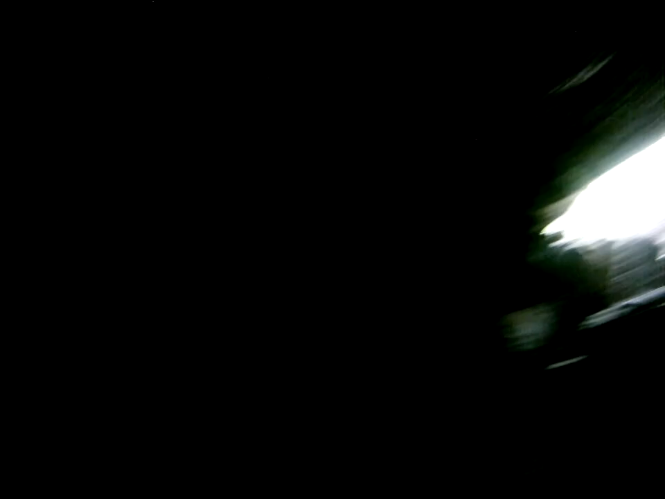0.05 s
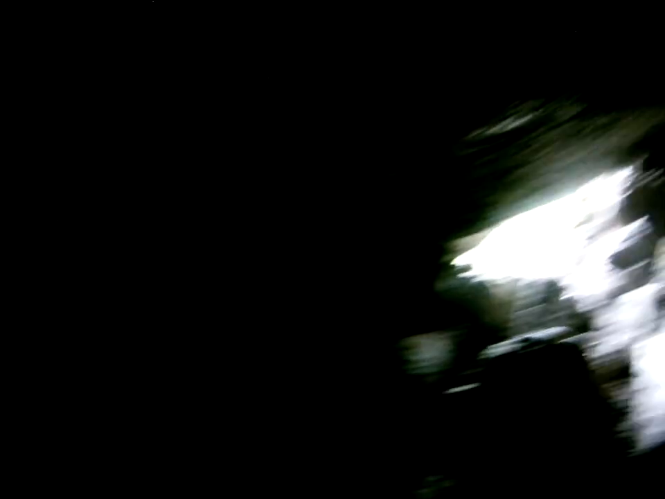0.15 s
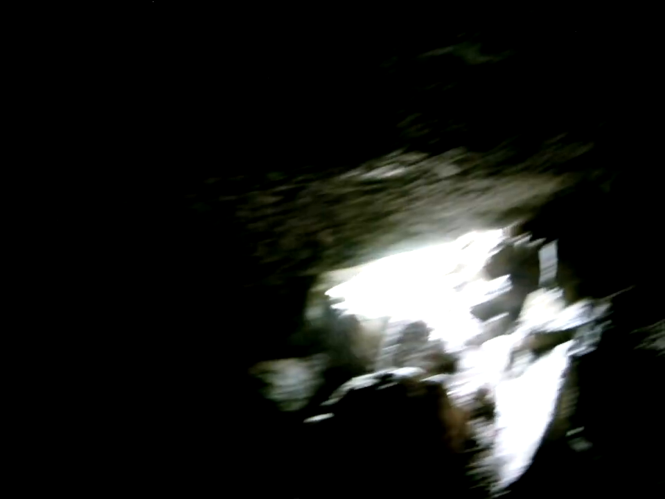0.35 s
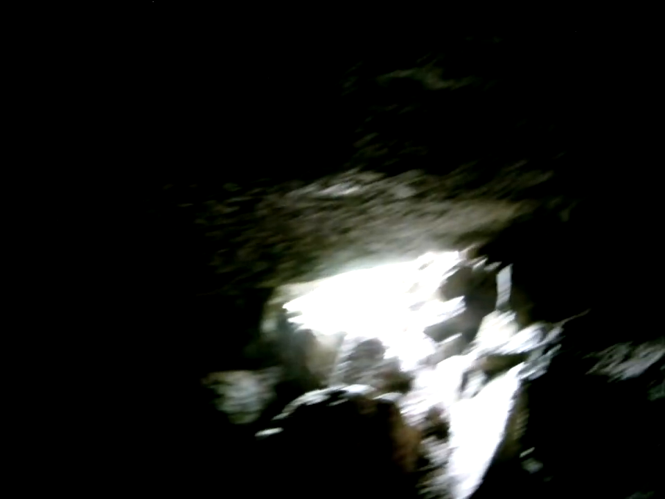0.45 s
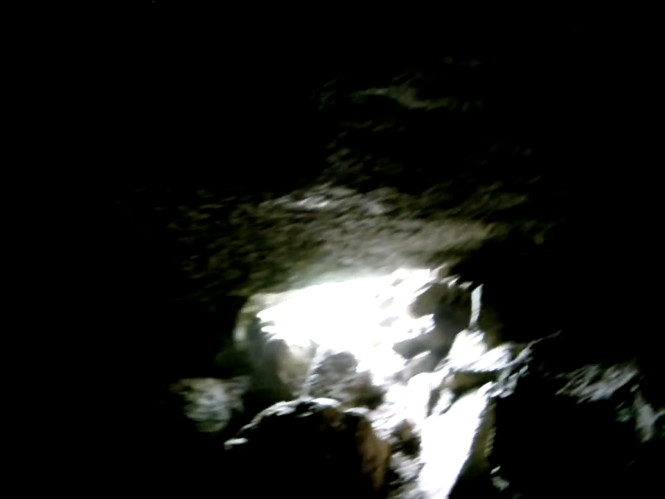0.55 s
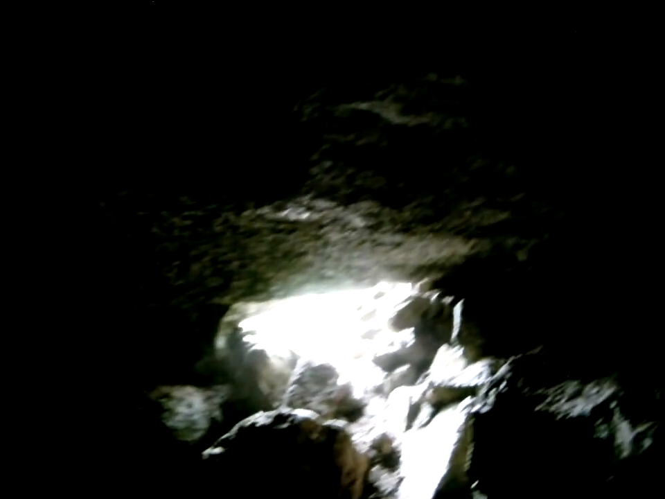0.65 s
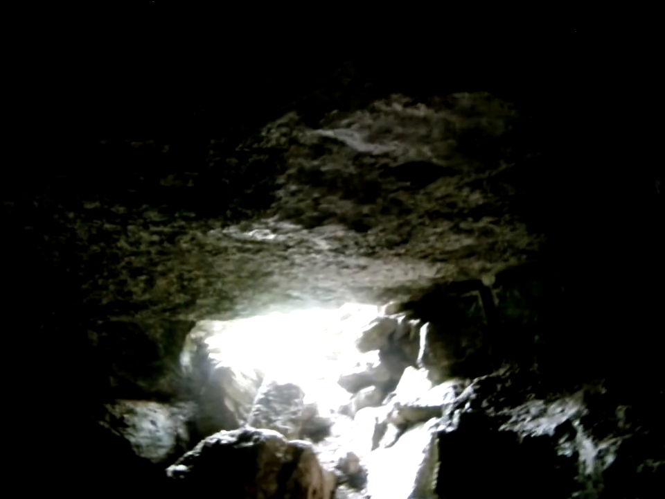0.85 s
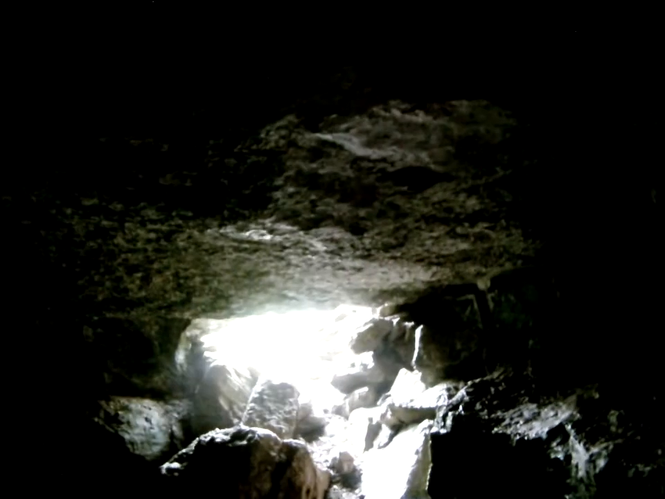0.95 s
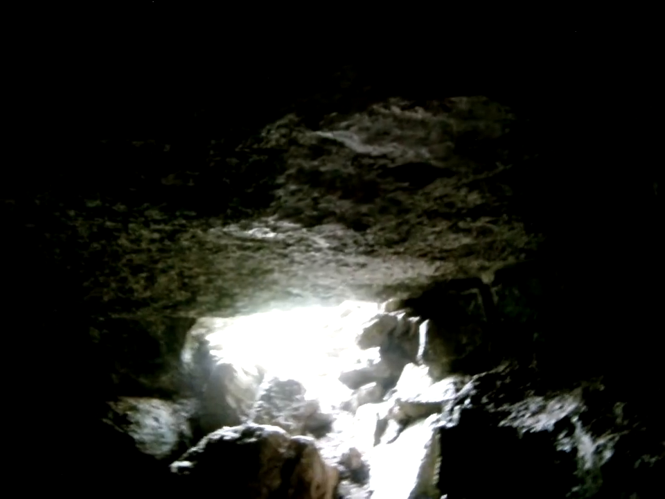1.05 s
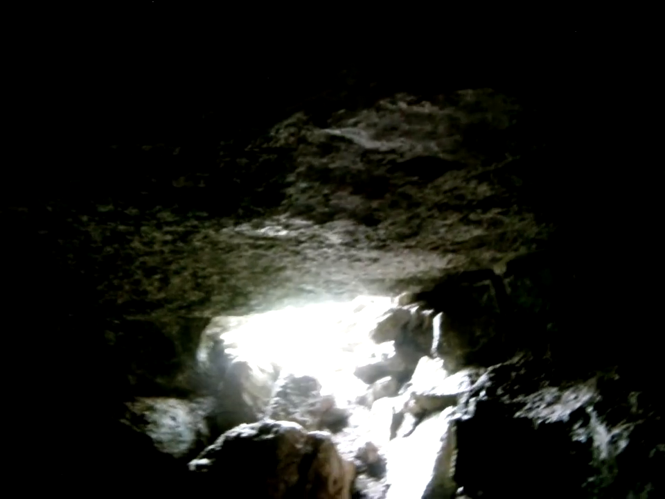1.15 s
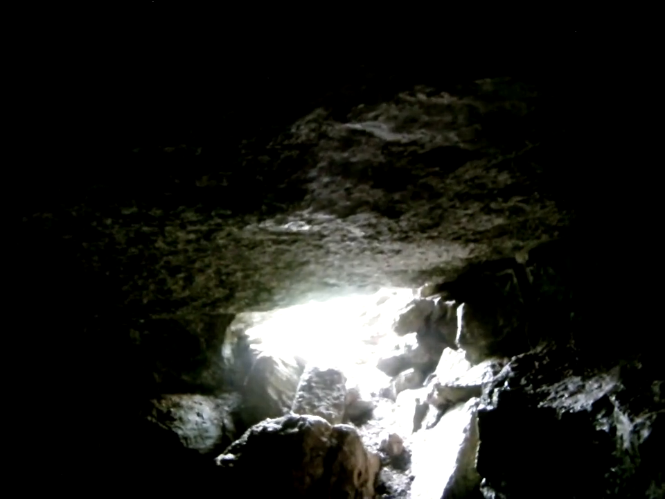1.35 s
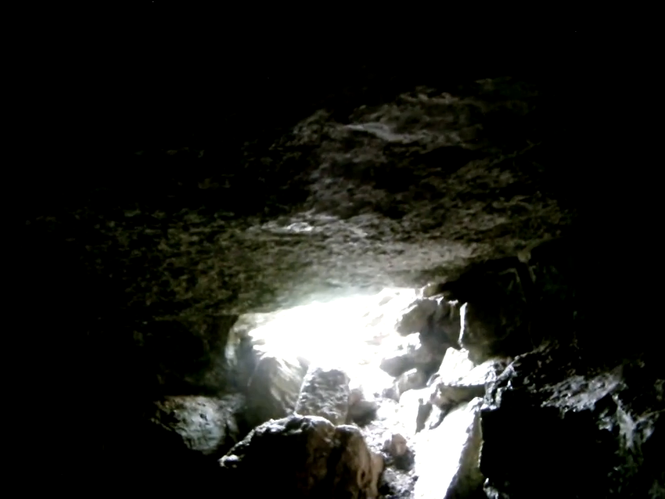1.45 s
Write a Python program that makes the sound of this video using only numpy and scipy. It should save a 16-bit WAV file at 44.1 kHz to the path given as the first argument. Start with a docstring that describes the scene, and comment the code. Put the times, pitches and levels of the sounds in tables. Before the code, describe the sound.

Camera handling noise in a quiet cave: one close plastic click comes first, followed by several duller knocks and low thumps through the case. They die away, leaving faint steady air and microphone hiss.

```python
"""Camera handling in a quiet cave.

Fingers shift on a hand-held camera: dry, close clicks and soft bumps reach the microphone through
the case, and pushes set the body wobbling at a low pitch. Faint cave air and microphone hiss lie
beneath. The camera's coarse sample-and-hold mirrors every sound into the treble as a thin, gritty edge."""
import sys
import numpy as np
from scipy import signal
from scipy.fft import rfft, irfft
from scipy.io import wavfile

SR = 44100
rng = np.random.default_rng(int(sys.argv[2]) if len(sys.argv) > 2 else 0)


def dump_mix(stems):
    """Bounce the given channels to the path in sys.argv[1] as a 16-bit WAV at rate SR."""
    frames = np.atleast_2d(stems).T  # one column per channel
    limited = np.clip(frames, -1, 1)  # hard clip at full scale
    pcm = np.round(limited * 32767).astype(np.int16)
    wavfile.write(sys.argv[1], SR, pcm)


N = 66150
TIME_S = np.arange(N) / SR


def from_db(db):
    """Decibels to gain."""
    return 10 ** (np.asarray(db) / 20)


def clicks(times_s, levels_db):
    """One impulse at each time."""
    out = np.zeros(N)
    np.add.at(out, np.round(np.asarray(times_s) * SR).astype(int), from_db(levels_db))
    return out


def ring(x, hz, t60_s):
    """Damped mode: a unit impulse starts a decaying unit sine."""
    radius = from_db(-60 / (t60_s * SR))
    step_rad = 2 * np.pi * hz / SR
    feedback = [1, -2 * radius * np.cos(step_rad), radius * radius]
    return signal.lfilter([0, radius * np.sin(step_rad)], feedback, x + 1e-18)


def sharp_ring(x, hz, t60_s):
    """Differentiated mode: abrupt onset, little energy below its pitch."""
    return np.diff(ring(x, hz, t60_s), prepend=0) / (2 * np.sin(np.pi * hz / SR))


def lowpass(x, hz, order=2):
    """Butterworth low-pass."""
    return signal.sosfilt(signal.butter(order, hz, fs=SR, output="sos"), x)


def struck(start_s, blow_db, modes):
    """One blow rings parallel modes of alternating sign."""
    return sum(sharp_ring(clicks([start_s], [blow_db + level_db]), hz, t60_s) * (-1) ** k
               for k, (hz, level_db, t60_s) in enumerate(modes))


def noise(spectrum):
    """Unit-rms shaped noise, rolled off below the first spectrum point."""
    hz, db = np.transpose(spectrum)
    bins_hz = np.maximum(np.arange(N // 2 + 1) * SR / N, 1)
    gain = from_db(np.interp(np.log(bins_hz), np.log(hz), db))
    gain *= np.minimum(bins_hz / hz[0], 1) ** 2
    out = irfft(rfft(rng.standard_normal(N)) * gain, N)
    return out / out.std()


def air_and_hiss():
    """Steady cave air and microphone hiss, centred but for a faint antiphase hiss."""
    # centre noise: freq_hz, density_db
    air_spectrum = [(20, -2.5), (40, 0), (52, 2), (75, -10), (120, -15.5), (230, -14.5), (320, -18),
                    (500, -20.5), (1000, -25.5), (2000, -28), (3500, -31.5), (5300, -36.5)]
    # side noise: freq_hz, density_db
    side_spectrum = [(100, -17), (300, -5.5), (3000, -6), (5200, -7.5)]
    centre = from_db(-56.5) * noise(air_spectrum)
    side = from_db(-74) * noise(side_spectrum)
    return centre + side * np.array([[1], [-1]])


def body_wobble():
    """The loosely held body swings after each push and heaves once as the grip shifts."""
    # pushes on the body: start_s, level_db
    pushes = [(0.144, -44), (0.2205, -33), (0.316, -28), (.536, -46), (0.579, -42.5), (0.7305, -47.5),
              (.751, -45.5), (1.013, -44.5), (1.19, -53), (1.356, -48.5), (1.394, -51.5)]
    swing = ring(clicks(*np.transpose(pushes)), hz=51.6, t60_s=0.26)
    heave_peak_s, heave_sigma_s, heave_hz = 0.684, 0.012, 38.4
    offset_s = TIME_S - heave_peak_s
    envelope = from_db(-28) * np.exp(-0.5 * (offset_s / heave_sigma_s) ** 2)
    heave = envelope * np.cos(2 * np.pi * heave_hz * offset_s)
    return lowpass(swing, hz=266) - heave


def finger_knocks():
    """Each contact gives a thud, body hum, clack and case ring; softer contacts pass less treble."""
    # contacts: start_s, thud_db, thud_hz, body_db, clack_db, case_db, cutoff_hz
    contacts = [(0.213, -35, 98, -60, -74, -76, 1390), (0.3131, -33, 205, -39.5, -26.5, -29.5, 3800),
                (0.525, -27.5, 257, -44.5, -70, -38.5, 2480), (0.7139, -23.5, 202, -41.5, -74, -42.5, 2260),
                (0.7406, -28, 188, -46, -54, -57, 1490)]
    # body hum: pitch_hz, level_db, t60_s
    body_modes = [(82.5, 1, 0.084), (106.5, -0.5, 0.11), (189, -0.5, 0.057), (246, 4, 0.036),
                  (256, -8, 0.16)]
    # hard-contact clack: pitch_hz, level_db, t60_s
    clack_modes = [(490, -8, 0.009), (739, 3, 0.023), (956, -0.5, 0.023), (1570, -6, 0.0033),
                   (2270, -3.5, 0.023)]
    # case ring: pitch_hz, level_db, t60_s
    case_modes = [(835, -7, 0.061), (1129, 0.5, 0.037), (1455, -6.5, 0.042), (1788, -3.5, 0.028),
                  (1897, -2.5, 0.024), (1985, 2.5, 0.027), (2182, 0.5, 0.013), (2710, -52, .016),
                  (3050, -11, 0.016), (3580, -3, 0.012)]
    out = 0
    for start_s, thud_db, thud_hz, body_db, clack_db, case_db, cutoff_hz in contacts:
        thud = sharp_ring(clicks([start_s], [thud_db]), thud_hz, t60_s=0.019)
        hum = struck(start_s, body_db, body_modes)
        bump = lowpass(thud + hum, hz=2.26 * thud_hz, order=4)
        clack = lowpass(struck(start_s, clack_db, clack_modes), hz=2750)
        case = lowpass(struck(start_s, case_db, case_modes), hz=3370)
        out = out + bump + lowpass(case - clack, cutoff_hz, order=8)
    return out


def shell_snaps():
    """The plastic shell slips: gritty bursts that die within milliseconds."""
    # slips: start_s, level_db
    slips = [(.3140, -36.5), (0.3178, -43.5), (0.3179, -63), (0.5735, -47), (0.7132, -52)]
    # grit: freq_hz, density_db
    grit_spectrum = [(500, -26), (1800, 2.5), (2500, 11), (3100, -7.5), (3700, 8.5), (4000, -27.5),
                     (5200, -10.5)]
    attack_s, t60_s = 0.00083, 0.018
    envelope = 0
    for start_s, level_db in slips:
        age_s = np.maximum(TIME_S - start_s, 0)
        attack = np.minimum(age_s / attack_s, 1)
        envelope = envelope + attack * from_db(level_db - 60 * age_s / t60_s)
    return envelope * noise(grit_spectrum)


def scene():
    """Dry, centred handling sounds over air and hiss."""
    return air_and_hiss() + body_wobble() + finger_knocks() + shell_snaps()


def record(dry):
    """Coarse sampler: band limit, mirror images either side of the hold rate, steep top cut."""
    hold_rate_hz, mirror_db = 12000, 0.04
    narrow = lowpass(dry, hz=5500, order=20)
    # differentiate, modulate, integrate: images fall as 1/f, as in a sample-and-hold
    slope = np.diff(narrow, prepend=0)
    mirror = np.cumsum(slope * 2 * np.cos(2 * np.pi * hold_rate_hz * TIME_S), axis=-1)
    low_cut = signal.butter(4, hold_rate_hz / 4, "high", fs=SR, output="sos")
    mirror = signal.sosfilt(low_cut, mirror)
    held = lowpass(narrow + from_db(mirror_db) * mirror, hz=15550, order=10)
    top_cut = signal.ellip(10, 0.2, 80, 15250, fs=SR, output="sos")
    return signal.sosfilt(top_cut, held)


dry = scene()
out = record(dry)
dump_mix(out)
```